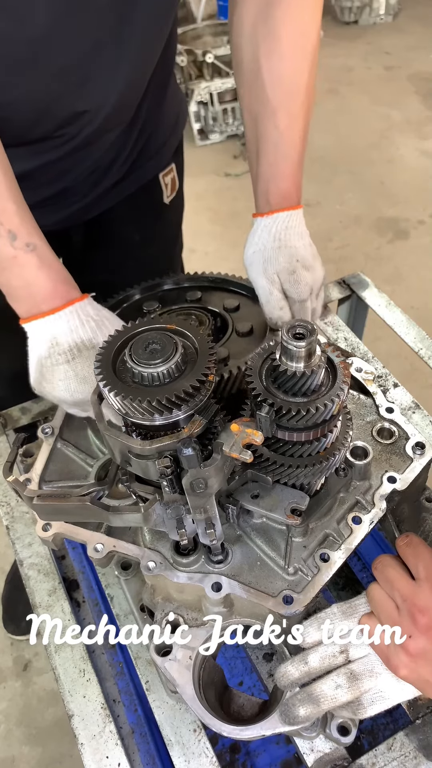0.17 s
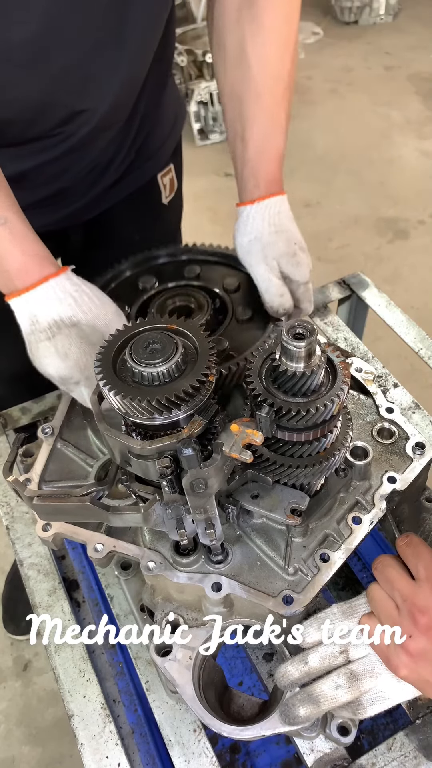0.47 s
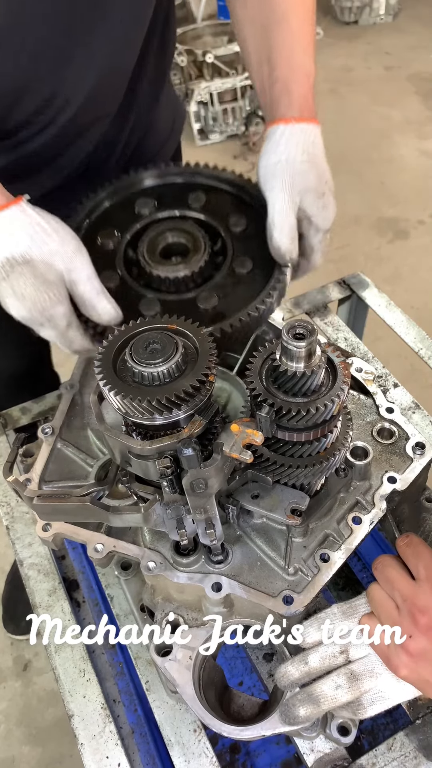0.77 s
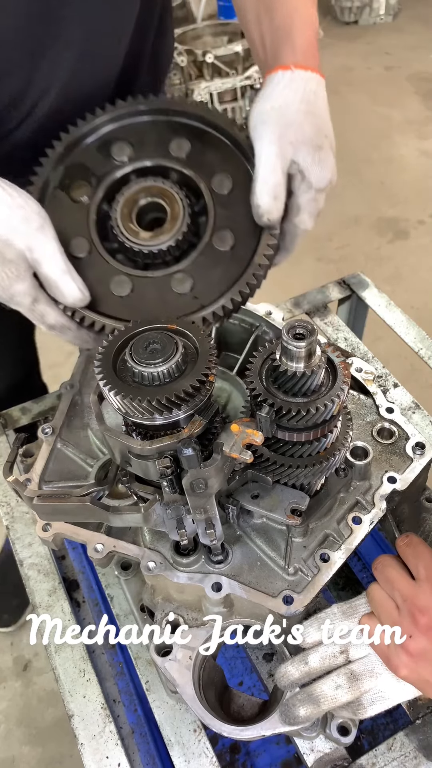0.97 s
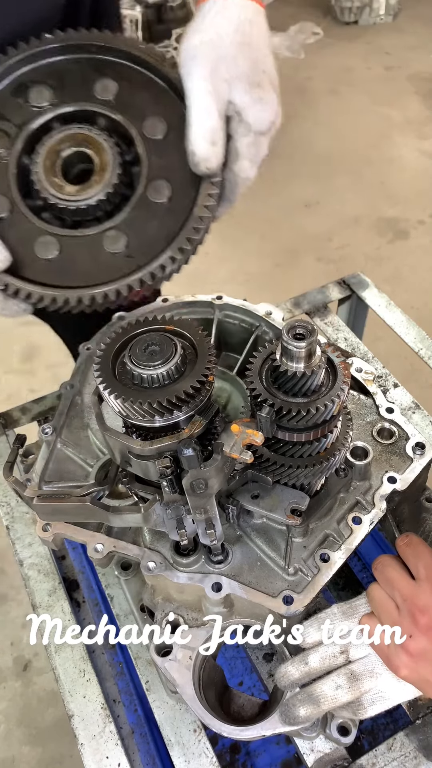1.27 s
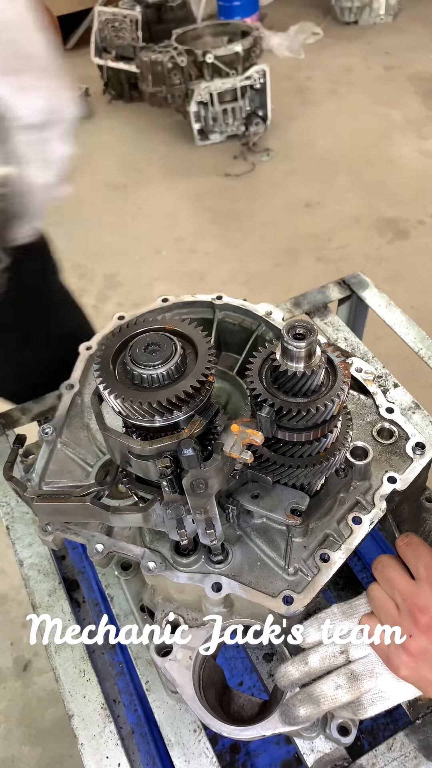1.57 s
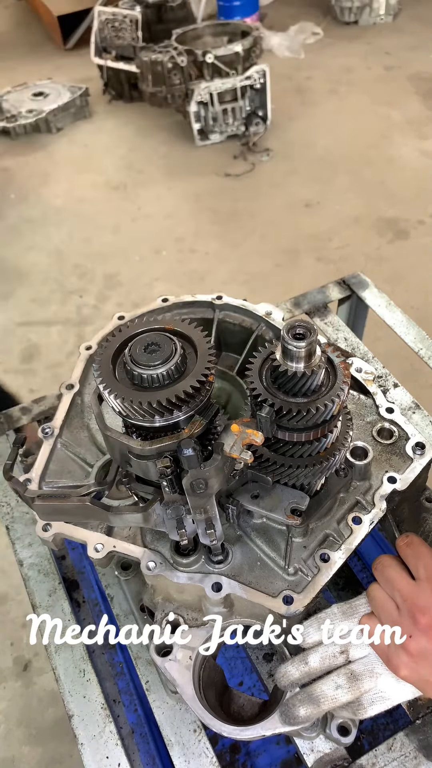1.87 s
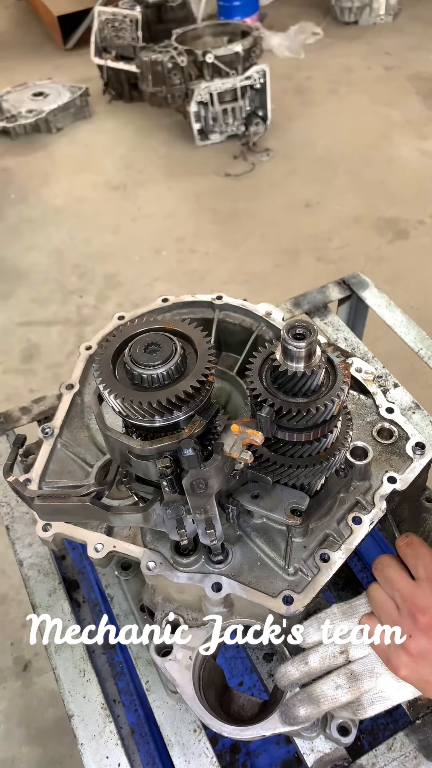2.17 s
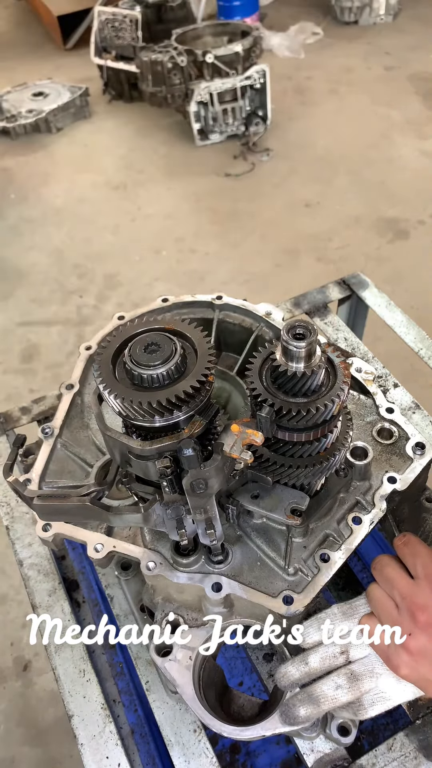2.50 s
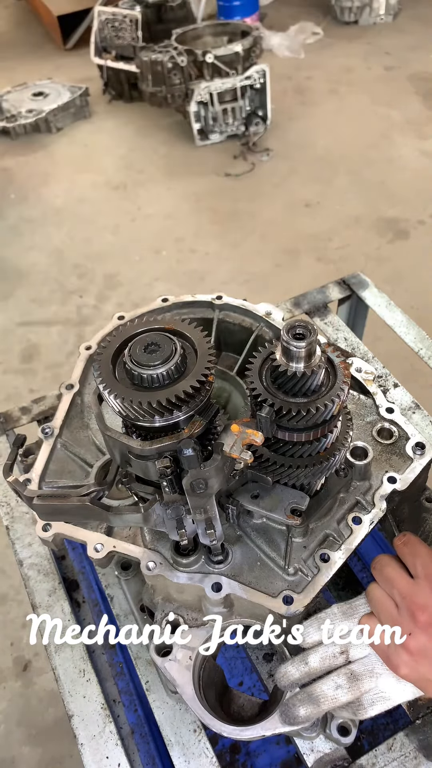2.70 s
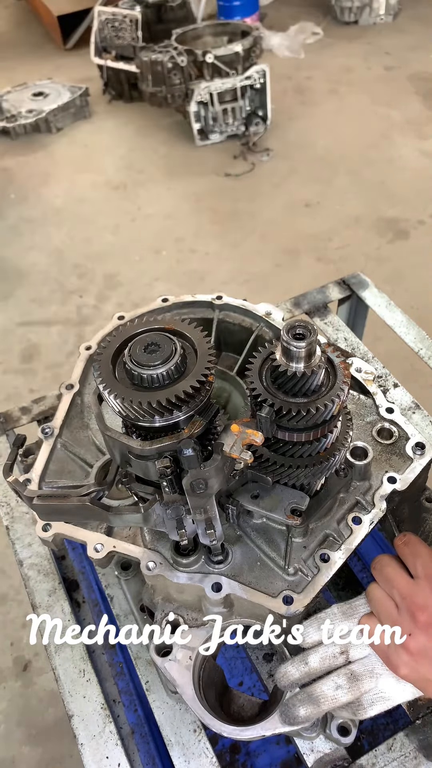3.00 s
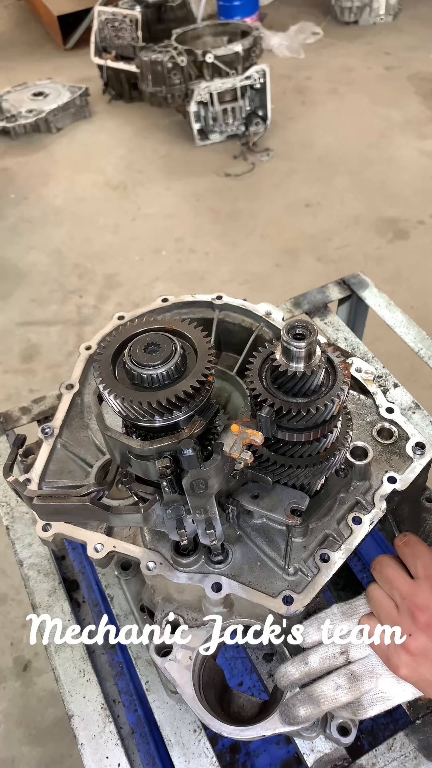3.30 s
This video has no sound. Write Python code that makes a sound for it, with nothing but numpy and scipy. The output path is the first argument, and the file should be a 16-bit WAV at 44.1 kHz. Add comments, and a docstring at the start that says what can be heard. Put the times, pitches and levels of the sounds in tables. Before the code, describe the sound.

A heavy steel gear grinds and clinks out of a gearbox, then lands with a booming clunk.

```python
"""Grinding is heard first: a large steel ring gear is worked out of an open gearbox in a reverberant workshop.
Filtered noise makes the grinding and sliding; two clinks against the shafts excite damped steel modes.
Shoes then scuff the concrete as shaped noise, the first scuff ending in a dull squeak.
Ticks and a short drag lead to a heavy clunk with a bright crash and a short rattle: noise bursts over
booming low modes. Noise with band-by-band decay makes the hall's echo."""
import sys
import numpy as np
from scipy import signal
from scipy.fft import rfft, irfft, next_fast_len
from scipy.io import wavfile

SR = 44100
rng = np.random.default_rng(int(sys.argv[2]) if len(sys.argv) > 2 else 0)


def dump(signal):
    """Clip the signal to [-1, 1] and save it as 16-bit WAV at the path in sys.argv[1]."""
    limited = np.clip(np.atleast_2d(signal).T, -1, 1)
    pcm = np.round(limited * 32767).astype(np.int16)
    wavfile.write(sys.argv[1], SR, pcm)


N = 152145  # length [samples]
T = np.arange(N) / SR  # time axis [s]

# Low rumble of the hall: (frequency [Hz], relative level [dB])
HALL_RUMBLE_COLOUR = [(15, -44.5), (25, -12.5), (67, -1.5), (110, -8.5), (129, -13.5), (213, -17.5),
                      (326, -26.5), (472, -35), (892, -40), (966, -51), (1190, -32), (1600, -39.5),
                      (3440, -42), (9660, -70.5), (14000, -60.5)]
HALL_RUMBLE_DB = -46.5
# Reverberation of the hall: (frequency [Hz], decay by 60 dB [s])
ROOM_T60 = [(70, 1.9), (250, 0.95), (1000, 1.45), (2500, 1.18), (7000, 0.77), (14000, 1.5)]
# Left-right correlation of diffuse sound: (frequency [Hz], correlation [-1 to 1])
EAR_CORRELATION = [(60, 0.94), (150, 0.91), (350, .65), (700, -0.19), (1500, 0.2), (4000, -0.38),
                   (12000, 0.48)]

# Grinding on the seat: (time [s], level [dB])
GRIND = [(0, -39.5), (.08, -43), (.14, -40.5), (.19, -45), (.25, -38), (.33, -40.5), (.4, -45),
         (.47, -52.5), (.7, -53.5), (1.0, -82)]
# Spectrum of the grinding: (frequency [Hz], relative level [dB])
GRIND_COLOUR = [(60, -20), (125, -2.5), (260, -0.5), (450, -2.5), (650, -17), (1000, -22.5), (3000, -45),
                (6500, -48.5), (14000, -66)]
# Light sliding of steel and gloves: (time [s], level [dB])
SLIDE = [(0, -52), (.1, -59), (.48, -63.5), (.8, -64.5), (.97, -56), (1.06, -50), (1.2, -51), (1.6, -91)]
# Spectrum of the sliding: (frequency [Hz], relative level [dB])
SLIDE_COLOUR = [(300, 3), (900, -14), (1900, 1.5), (3000, -6), (4000, -4.5), (5000, -29), (7000, -22.5),
                (10000, -52.5), (14000, -35.5)]
# The gear sticks and groans on its seat: (centre time [s], half-width [s], frequency [Hz], level [dB])
GROANS = [(.14, 0.026, 444, -42), (.255, 0.03, 464, -42), (.27, 0.018, 246, -40), (.39, 0.038, 135, -41)]
RUB_Q = 5  # centre frequency over bandwidth
# The gear bumps the aluminium housing: (time [s], level [dB])
BUMPS = [(.5655, -31.5), (1.0875, -28), (1.0908, -20)]
# Modes of the housing: (frequency [Hz], relative level [dB], decay by 60 dB [s])
HOUSING_MODES = [(251, -19.5, 0.57), (312, 1.5, 0.056), (383, -16, 0.27), (447, -20, .3), (548, -18.5, .35),
                 (620, -14, 0.044)]
HOUSING_ROOM_DB = 0.5

# The gear knocks the shafts: (time [s], ring level [dB], crack level [dB], room level [dB], right ear lead [s])
CLINKS = [(.5567, -20.5, -21.5, -3.5, 0.00011), (1.0706, -14.5, -16.5, -3, 0.00013)]
# Tooth contacts within one clink: (delay [s], relative level [dB])
CHATTER = [(0, 1), (.0016, -4), (.0027, -5.5)]
# Modes of gloved gear and shafts:
# (frequency [Hz], decay by 60 dB [s], relative level at first contact [dB], at second contact [dB])
GEAR_MODES = [(600, 0.0255, -33, -16), (1154, 0.026, -9, -12.5), (1400, 0.013, -24.5, -18),
              (1768, 0.09, -14, -13.5), (2044, 0.068, -12, -15.5), (2350, 0.083, -11, -9),
              (2700, 0.038, -21, -13), (3240, .04, -10, -30), (3500, 0.092, -26, -18),
              (3660, 0.062, -15, -29), (6880, 0.047, -36, -16.5), (8120, .07, -39.5, -38)]
# Faint after-ring of the freed gear: (frequency [Hz], relative level [dB], decay by 60 dB [s])
AFTER_RING = [(1324, -46, 1.2), (1357, -46, 1.2), (1884, -36, 1.4), (1897, -38, 1.4), (1927, -39, .9),
              (1964, -40, .9), (2266, -43, .9), (2406, -44, 1.0), (3155, -50, .9), (3585, -42, 1.0),
              (3639, -42, .8)]
# Spectrum of the crack, one list for each contact: (frequency [Hz], relative level [dB])
CRACK_COLOURS = [
    [(200, -21.5), (600, 3), (1150, 2.5), (1400, 2), (1900, 2), (2500, -6.5), (3000, -15), (3700, 1),
     (4300, -13), (5000, -29.5), (6800, -21), (8500, -29), (14000, -43)],
    [(200, -9.5), (600, -2), (1000, 3.5), (1400, -4.5), (1900, 3.5), (2700, -3.5), (3300, -13), (3600, -4),
     (5000, -23.5), (6200, -19.5), (7000, -15.5), (8300, -30.5), (14000, -43)],
]
CRACK_ATTACK_S, CRACK_HOLD_S, CRACK_T60_S = 0.00034, 0.0023, 0.023  # hold counts from the onset
RING_ROOM_DB = -18

# Scuffs on the floor:
# (start [s], attack [s], hold [s], release [s], level [dB], spectral tilt [dB per octave])
SCUFFS = [(1.667, 0.037, .22, .08, -47.5, -0.5), (3.302, 0.12, .05, .1, -42.5, 4.5)]
# Spectrum of a scuff before its tilt: (frequency [Hz], relative level [dB])
SCUFF_COLOUR = [(200, -22), (550, -8), (900, -3.5), (1900, -1.5), (3800, -3.5), (5000, -12), (6800, -9),
                (9000, -25.5), (12000, -26), (14000, -35)]
SCUFF_ROOM_DB = 2
# The sole catches as the first scuff ends: (centre time [s], half-width [s], frequency [Hz], level [dB])
SQUEAKS = [(1.905, 0.019, 930, -55), (1.936, 0.015, 870, -51.5), (1.965, 0.029, 790, -56)]

# Small metal ticks: (time [s], level [dB])
TICKS = [(2.429, -54), (2.6, -38), (2.636, -33)]
# Spectrum of a tick: (frequency [Hz], relative level [dB])
TICK_COLOUR = [(400, -26), (1500, -11), (2300, -7), (2900, 0), (3600, -4), (4800, -22), (7000, -23),
               (14000, -36)]
TICK_T60_S = .04

# The gear drags just before it drops: (time [s], level [dB])
DRAG = [(2.5, -83), (2.55, -54), (2.61, -49), (2.66, -45.5), (2.69, -54)]
# Spectrum of the drag: (frequency [Hz], relative level [dB])
DRAG_COLOUR = [(400, -18.5), (1500, -9), (2300, -4), (2800, 2), (3700, -0.5), (4900, -12), (6500, -5),
               (8500, -21), (14000, -32)]
# Bright crashes where steel edges meet: (time [s], level [dB], decay by 60 dB [s])
CRASHES = [(2.676, -29.5, 0.21), (2.698, -28, 0.16), (2.94, -43, 0.22), (2.96, -44.5, .2),
           (3.115, -59.5, 0.2)]
# Spectrum of the crashes: (frequency [Hz], relative level [dB])
CRASH_COLOUR = [(500, -19), (1200, -8), (2200, 4.5), (5000, -4), (7000, 10), (9000, -2.5), (12000, -3.5),
                (14000, -9)]

# The gear lands and settles: (time [s], relative level [dB], decay by 60 dB [s])
LANDING = [(2.672, -20, 0.33), (2.694, -14, 0.17), (2.723, -23, 0.41), (2.89, -35, 0.24),
           (2.948, -34, 0.35), (3.111, -44.5, 0.45)]
# Spectrum of the landing: (frequency [Hz], relative level [dB])
LANDING_COLOUR = [(30, -33), (50, -28), (80, -5), (125, -15), (170, -3), (280, -4.5), (400, -10.5),
                  (700, -11), (1000, -13), (1500, -15.5), (2100, -14), (3000, -19.5), (4200, -22.5),
                  (5100, -29), (6800, -28.5), (8300, -32), (9500, -55), (12000, -41), (14000, -63)]
LANDING_ATTACK_S, LANDING_LEFT_LEAD_S = 0.011, 0.00048
LANDING_DB, LANDING_ROOM_DB = 1.5, 4.5
# Low blows into the surface beneath: (time [s], level [dB])
THUMPS = [(2.6845, -21.5), (2.697, -16), (2.822, -41), (2.872, -33.5), (3.2, -37)]
# Booming modes of that surface: (frequency [Hz], relative level [dB], decay by 60 dB [s])
BOOM_MODES = [(69.2, -20, 0.16), (80.98, -2, 0.65), (86.2, -11.5, 2.86), (175.3, -5.5, 0.57),
              (206, -4, 0.69), (244.3, -9, 0.81), (271, -4.5, 1.07), (320.3, -19.5, 0.9), (495, -13, 0.53),
              (653, -16.5, 0.5), (814, -20, 0.62), (1218, -22.5, 0.9)]
# The surface rumbles on as the gear rocks to rest: (time [s], level [dB])
RUMBLE = [(2.66, -51), (2.69, -24.5), (2.79, -25.5), (2.9, -25.5), (3.0, -28), (3.14, -37), (3.26, -37.5),
          (3.45, -42)]
# Spectrum of that rumble: (frequency [Hz], relative level [dB])
RUMBLE_COLOUR = [(35, -28), (55, -16), (80, -1), (100, -5.5), (140, -10.5), (190, -10), (300, -16.5),
                 (500, -19.5), (1000, -28.5), (4000, -75.5)]

LOW_CUT_HZ = 31.6
CUTOFF_HZ = 14800  # from here up at least 70 dB is removed


def from_db(db):
    """Logarithmic level: 20 dB is a tenfold amplitude."""
    return 10 ** (np.asarray(db) / 20)


def rms_one(x):
    """Power normalisation: the root mean square becomes one."""
    return x / np.sqrt(np.mean(x ** 2) + 1e-20)


def at_hz(points, hz):
    """Logarithmic pitch scale: values are interpolated against log frequency."""
    f, v = np.transpose(points)
    return np.interp(np.log(np.maximum(hz, 1)), np.log(f), v)


def level(points):
    """Amplitude envelope: decibels are interpolated in time and turned into gain."""
    return from_db(np.interp(T, *np.transpose(points)))


def dying(s, t60, attack_s):
    """Exponential decay: a linear rise from time s multiplies a fall of 60 dB per t60."""
    age = np.maximum(T - s, 0)
    return np.minimum(age / attack_s, 1) * from_db(-60 * np.minimum(age / t60, 5))


def delayed(x, s):
    """Propagation delay: every channel arrives s seconds later."""
    return np.array([np.interp(T - s, T, channel, left=0) for channel in x])


def noise(colour, near=0):
    """Interaural correlation: shared and opposed noises mix into coloured stereo; near=1 is alike in both ears."""
    size = next_fast_len(N)
    hz = np.arange(size // 2 + 1) * SR / size
    alike = np.clip(near + (1 - near) * at_hz(EAR_CORRELATION, hz), -1, 1)
    mid, side = rfft(rng.standard_normal((2, size))) * from_db(at_hz(colour, hz))
    spectrum = np.sqrt(1 + alike) * mid + np.sqrt(1 - alike) * side * [[1], [-1]]
    return rms_one(irfft(spectrum, size)[:, :N])


def coloured(x, colour):
    """Linear filtering: a spectral gain of unit mean power shapes the sound."""
    size = next_fast_len(N + SR)
    gain = rms_one(from_db(at_hz(colour, np.arange(size // 2 + 1) * SR / size)))
    return irfft(rfft(x, size) * gain, size)[:, :N]


def grain(per_s, depth_db):
    """Random amplitude modulation: many small contacts vary in strength, with rms one."""
    steps = rng.standard_normal(8000)
    wander = np.interp(T * per_s, np.arange(len(steps)), steps)
    return rms_one(from_db(depth_db * np.clip(wander, -2, 2)))


def strike(hits, modes):
    """Modal synthesis: impulses excite two-pole resonators, one for each damped mode."""
    clicks, out = np.full(N, 1e-18), 0  # the tiny offset avoids slow denormal arithmetic
    for s, db in hits:
        clicks[int(s * SR)] += from_db(db)
    for hz, db, t60 in modes:
        r = from_db(-60 / (t60 * SR))  # pole radius: decay per sample
        w = 2 * np.pi * hz / SR
        feedback = [1, -2 * r * np.cos(w), r * r]
        out = out + signal.lfilter([0, from_db(db) * np.sin(w)], feedback, clicks)
    return out


def rubs(rows):
    """Stick-slip friction: bell-shaped swells of noise sound through a broad resonance."""
    out, white = 0, rng.standard_normal(N)
    for s, width_s, hz, db in rows:
        edges = [hz * (1 - .5 / RUB_Q), hz * (1 + .5 / RUB_Q)]
        band = signal.butter(2, edges, "band", fs=SR, output="sos")
        swell = np.exp(-((T - s) / width_s) ** 2)
        out = out + from_db(db) * rms_one(signal.sosfilt(band, white)) * swell
    return out


def workshop():
    """Diffuse reverberation: each noise band decays at its own rate, scaled for unit power gain."""
    edges, out = np.geomspace(40, 16000, num=20), 0
    white = noise([(20, 0), (20000, 0)])
    for low, high in zip(edges, edges[1:]):
        t60 = at_hz(ROOM_T60, np.sqrt(low * high))
        tail = dying(0.0021, t60, 0.0027)
        band = signal.butter(2, [low, high], "band", fs=SR, output="sos")
        out = out + signal.sosfilt(band, white) * tail / np.sqrt(np.sum(tail ** 2))
    return out


def room_echo(x, room, wet_db):
    """Convolution: the hall answers every instant of the sound with its impulse response."""
    return from_db(wet_db) * signal.fftconvolve(np.atleast_2d(x), room, axes=1)[:, :N]


def in_room(x, room, wet_db):
    """Superposition: direct sound and the hall's echo add."""
    return x + room_echo(x, room, wet_db)


def hall_rumble():
    """Stationary noise: a steady, mostly low rumble fills the hall."""
    return from_db(HALL_RUMBLE_DB) * noise(HALL_RUMBLE_COLOUR)


def housing(room):
    """Forced and free vibration: friction noise from grinding and sliding joins the bumped hollow case's modes."""
    bumps = in_room(strike(BUMPS, HOUSING_MODES), room, HOUSING_ROOM_DB)
    grind = level(GRIND) * noise(GRIND_COLOUR, near=.4) * grain(per_s=160, depth_db=1.0)
    slide = level(SLIDE) * noise(SLIDE_COLOUR) * grain(per_s=90, depth_db=2.5)
    balance = from_db([[-1.2], [1.2]])  # left, right
    return (bumps + grind + rubs(GROANS)) * balance + slide


def clinks(room):
    """Impact and modal ringing: chattering teeth give a crack, glove-damped modes and a faint after-ring."""
    out = 0
    for k, (s, ring_db, crack_db, room_db, lead_s) in enumerate(CLINKS):
        contacts = [(s + lag, ring_db + db) for lag, db in CHATTER]
        modes = [(hz, dbs[k], t60) for hz, t60, *dbs in GEAR_MODES]
        ring = strike(contacts, modes) + strike([(s, ring_db)], AFTER_RING)
        ears = np.array([np.interp(T - lead_s, T, ring), ring])  # the left ear hears it later

        attack = np.clip((T - s) / CRACK_ATTACK_S, 0, 1)
        decay = from_db(-60 * np.clip((T - s - CRACK_HOLD_S) / CRACK_T60_S, 0, 5))
        contact = attack * decay
        crack = from_db(crack_db) * noise(CRACK_COLOURS[k], near=0.9) * contact
        # so short a crack acts as an impulse of equal energy on the hall
        strength = from_db(crack_db + room_db) * np.sqrt(np.sum(contact ** 2))
        echo = delayed(strength * coloured(room, CRACK_COLOURS[k]), s)
        out = out + in_room(ears, room, RING_ROOM_DB) + crack + echo
    return out


def scuffs(room):
    """Sliding friction: gritty noise follows the sole's pressure, with stick-slip squeaks ending the first drag."""
    grit = 0
    for s, rise, hold, fall, db, tilt_db in SCUFFS:
        corners = s + np.cumsum([0, rise, hold, fall])
        pressure = from_db(db) * np.interp(T, corners, [0, 1, 1, 0])
        colour = [(hz, band_db + tilt_db * np.log2(hz)) for hz, band_db in SCUFF_COLOUR]
        grit = grit + pressure * noise(colour)
    drags = in_room(grit * grain(per_s=400, depth_db=1.5), room, SCUFF_ROOM_DB)
    return drags + in_room(rubs(SQUEAKS), room, wet_db=6)


def ticks(room):
    """Brief contact: light touches of loose steel are short decaying noise bursts."""
    touches = sum(from_db(db) * dying(s, TICK_T60_S, 0.0019) for s, db in TICKS)
    return in_room(touches * noise(TICK_COLOUR), room, wet_db=-3)


def summed_force(hits, attack_s):
    """Incoherent addition: the powers of separate decaying blows add."""
    return np.sqrt(sum((from_db(db) * dying(s, t60, attack_s)) ** 2 for s, db, t60 in hits))


def crashes():
    """Friction, then impact: steel edges drag and crash with a quickly dying sizzle of noise."""
    sizzle = summed_force(CRASHES, .005) * noise(CRASH_COLOUR) * grain(per_s=800, depth_db=0.0)
    drag = level(DRAG) * noise(DRAG_COLOUR) * grain(per_s=400, depth_db=1.5)
    return sizzle + drag


def clunk(room):
    """Impact and resonance: clatter and a blow that reaches the left ear first join low modes and the echo."""
    force = from_db(LANDING_DB) * summed_force(LANDING, LANDING_ATTACK_S)
    clatter = force * noise(LANDING_COLOUR) * grain(per_s=450, depth_db=-0.5)
    blow = force * noise(LANDING_COLOUR)[:1] * grain(per_s=700, depth_db=2)  # one channel
    echo = room_echo(blow, room, LANDING_ROOM_DB)
    direct = from_db(-2.5) * np.vstack([blow, delayed(blow, LANDING_LEFT_LEAD_S)])
    boom = in_room(strike(THUMPS, BOOM_MODES), room, wet_db=-11)
    rumble = level(RUMBLE) * noise(RUMBLE_COLOUR)
    balance = from_db([[-1.3], [1.3]])  # left, right
    return from_db(-1.5) * clatter + direct + echo + (boom + rumble) * balance


def scene():
    """Superposition: all sources add over the low rumble of the hall."""
    room = workshop()
    handling = housing(room) + clinks(room)
    carrying = scuffs(room)
    landing = ticks(room) + crashes() + clunk(room)
    return hall_rumble() + handling + carrying + landing


def record(dry):
    """Band limitation: the deepest bass is removed, a narrow treble band is thinned, and the top is cut."""
    low_cut = signal.butter(2, LOW_CUT_HZ, "high", fs=SR, output="sos")
    without_bass = signal.sosfilt(low_cut, dry)
    notched = signal.lfilter(*signal.iirnotch(9900, 9, SR), without_bass)  # centre [Hz], Q
    top_cut = signal.cheby2(16, 70, CUTOFF_HZ, fs=SR, output="sos")
    return signal.sosfilt(top_cut, notched)


dry = scene()
out = record(dry)
dump(out)
```